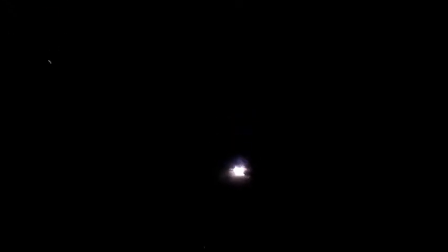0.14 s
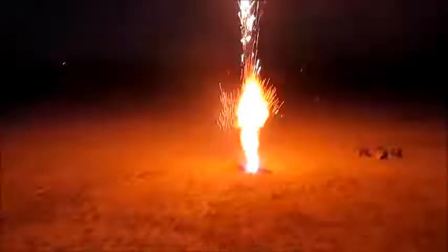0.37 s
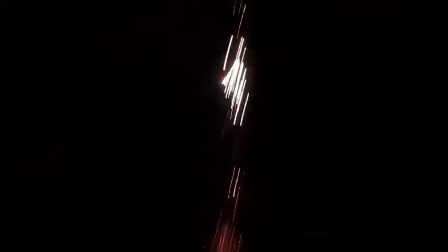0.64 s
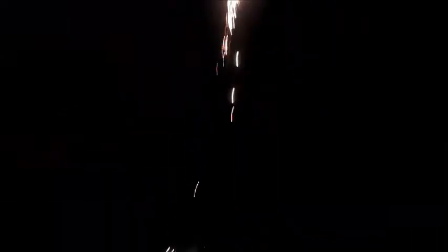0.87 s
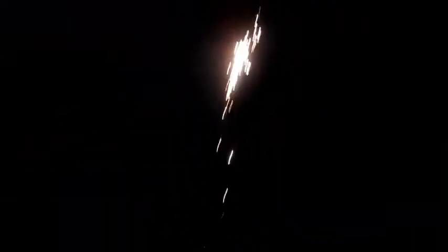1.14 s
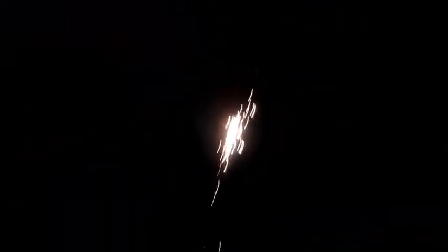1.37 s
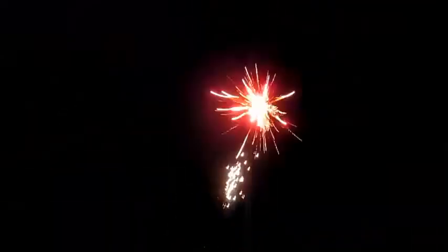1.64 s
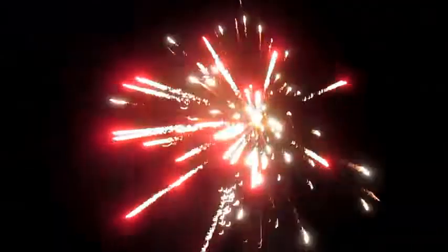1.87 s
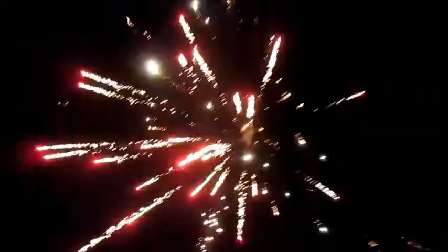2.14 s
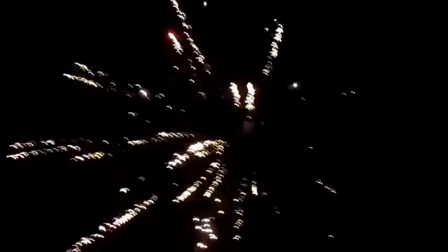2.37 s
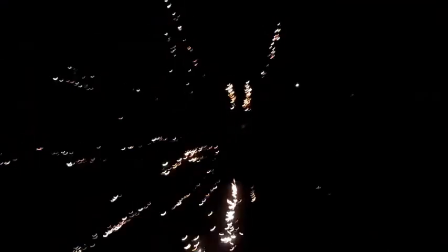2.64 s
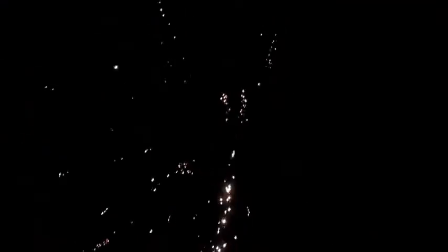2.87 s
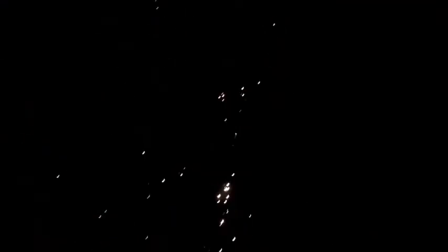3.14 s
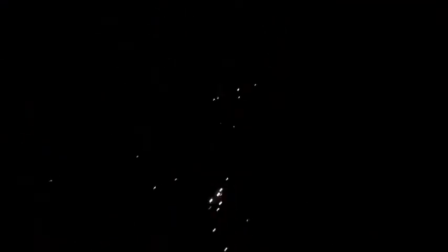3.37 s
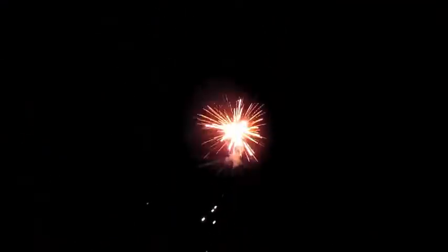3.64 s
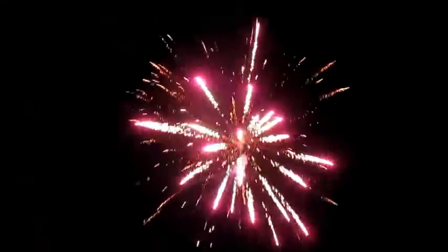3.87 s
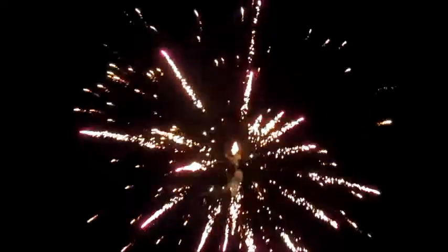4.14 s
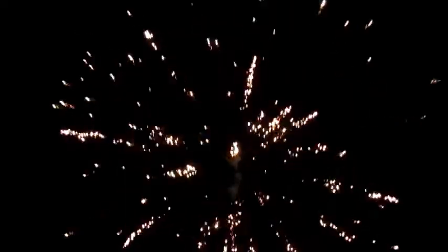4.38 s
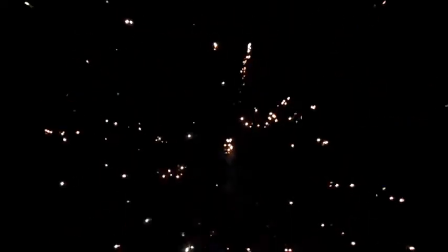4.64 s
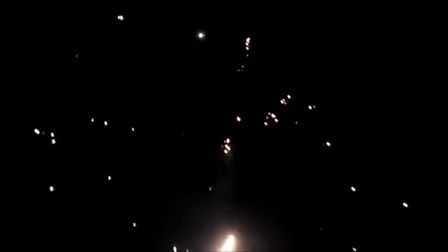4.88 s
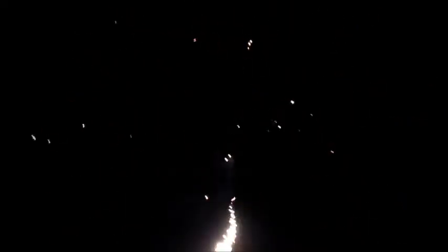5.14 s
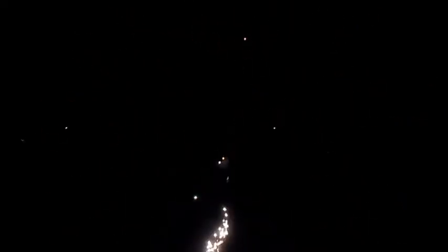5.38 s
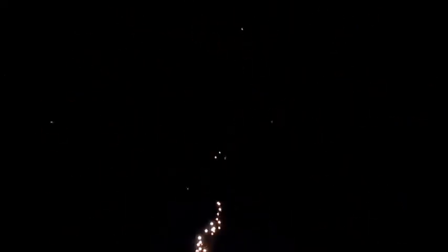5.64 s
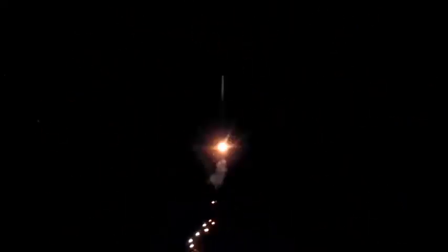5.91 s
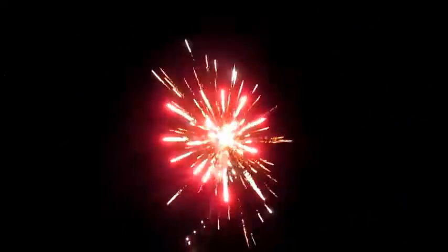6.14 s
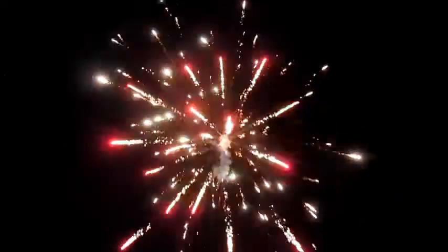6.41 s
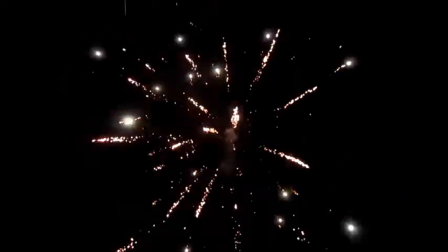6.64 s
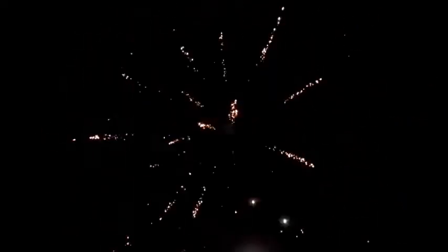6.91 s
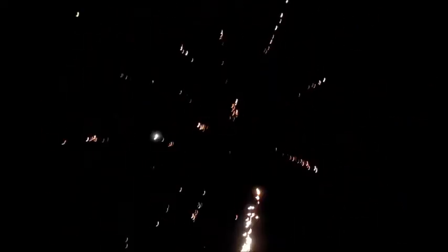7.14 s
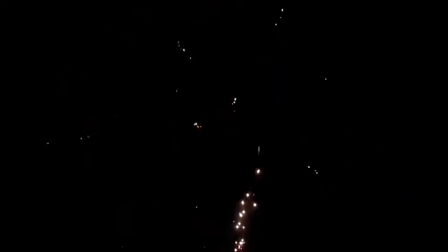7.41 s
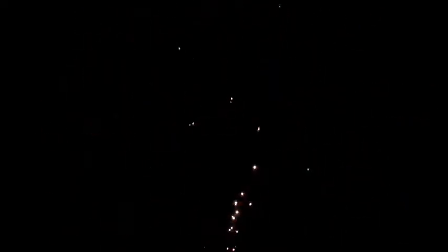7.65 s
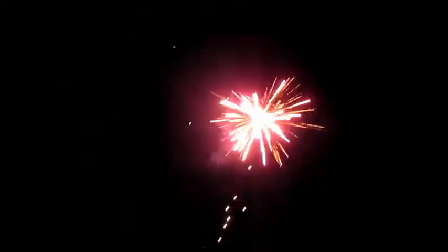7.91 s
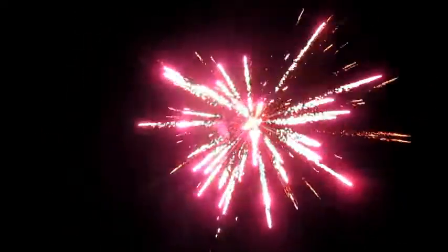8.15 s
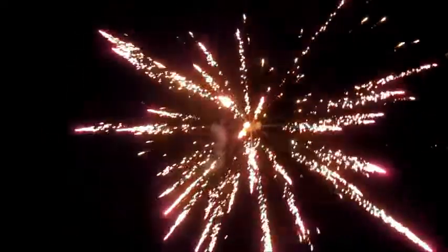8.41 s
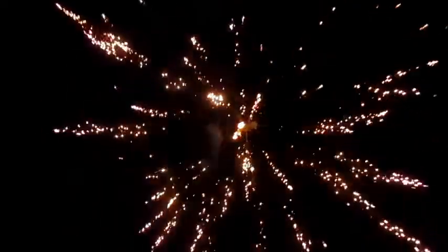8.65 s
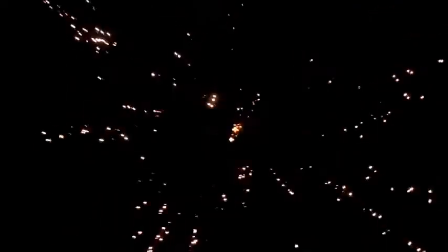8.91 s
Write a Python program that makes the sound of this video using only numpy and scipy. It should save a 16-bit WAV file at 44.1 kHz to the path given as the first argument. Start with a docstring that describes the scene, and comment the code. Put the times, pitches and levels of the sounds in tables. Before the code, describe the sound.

Outdoors at night, a firework cake fires four cracking launches and four sky bangs in steady alternation, distorted up close, their echoes fading into quiet.

```python
"""A firework cake at night. At first wind and the hiss of the fuse (shaped noise) are heard over a town's hum.
Then four times a shell is shot from its tube: a pressure shock and a roar of gas, with returns from a fence
and walls. About 1.4 s after each shot the shell bursts overhead: a sharp shock, a duller copy off the
ground and sky echoes. Every blast overloads the microphone and rolls away as fading noise, while the
background sinks."""
import sys
import numpy as np
from scipy import signal
from scipy.fft import rfft, irfft, next_fast_len
from scipy.io import wavfile
from scipy.ndimage import uniform_filter1d

SR = 44100
rng = np.random.default_rng(int(sys.argv[2]) if len(sys.argv) > 2 else 0)


def digitize_waveform(pressure):
    """Quantize a signal to 16-bit integers and store it at the path in sys.argv[1].

    Rows of a 2-D input are taken as channels; values are limited to [-1, 1].
    """
    field = np.atleast_2d(pressure).T
    bounded = np.clip(field, -1, 1)
    quanta = np.round(bounded * 32767).astype(np.int16)
    wavfile.write(sys.argv[1], SR, quanta)


def to_linear_factor(level_db):
    """Convert decibel levels (scalar or array-like) to linear amplitude factors."""
    exponent = np.asarray(level_db, float) / 20
    return 10 ** exponent


N = 398223

# Shots from the tube. Each row: start in seconds, gas roar in dB before its swell, lead of the roar in ms,
# level of all returns in dB, extra delay of the echoes in ms.
LIFTS = [(0.3157, 2.5, 8.5, 3.5, 7), (2.2531, -12, 2.9, 6, 0.2), (4.4785, -22.5, 5.4, -1.5, 1.5),
         (6.66, -16, 2.6, -3.5, 0.5)]
# Second shock as the shell clears the mouth, one row a lift. Each row: delay in ms, level in dB.
CLEARS = [(2.2, 0.5), (1.4, 1), (1.9, -6), (1.1, 0)]
# Bursts in the sky. Each row: start in seconds, shock in dB, delay of the ground bounce in ms,
# level of all returns in dB, shift of the farthest echoes in ms.
BURSTS = [(1.7027, 5, 10.7, 5, -1), (3.7300, 2, 11.1, 4, -13.5), (6.0650, 1.5, 11.0, 3.5, -7.5),
          (7.9578, 1.5, 10.9, 0.5, 0.6)]
# First bounces off things beside the microphone. Each row: delay in ms, level in dB, hump width in ms.
NEAR_LIFT = [(1.3, -12, 0.4), (2.2, -6, 1.2), (3.2, -11.5, 1.6)]
NEAR_BURST = [(1.4, -9.5, 0.2), (2.5, -3.5, 0.45), (3.0, -8, 5.4)]
# Walls that return every lift. Each row: delay in seconds, level in dB against the returns,
# centre in Hz, width in Hz before a common stretch.
WALLS = [(.117, -27.5, 1200, 1500), (.3085, -21.5, 1740, 7000), (0.3096, -26, 336, 497),
         (.451, -40.5, 1080, 800), (.654, -43.5, 400, 400), (.663, -43.5, 2430, 1800),
         (.688, -50, 2600, 1800), (.712, -42.5, 1210, 913), (.726, -41, 2500, 1770),
         (0.7264, -29.5, 820, 416), (.7345, -42.5, 2460, 1770), (.742, -41, 1900, 2600),
         (0.784, -47.5, 1500, 1500), (.808, -47, 1890, 1190), (1.055, -51.5, 796, 700),
         (1.125, -54.5, 2450, 1500)]
# Fence posts. In order: nominal delay of the first post in seconds, gap in seconds, growth of the gap per post.
FENCE = (.117, .0036, 1.035)
# A barely present bright noise after a shot, on the early slope of a far-off bell curve.
# In order: centre of the bell in seconds, its spread in seconds, level in dB at the centre
# against the returns, centre in Hz, width in Hz.
FAINT_RISE = (3, 0.72, -51, 5000, 3000)
# Walls that return every burst. Each row: delay in seconds, level in dB against the returns, centre in Hz.
SKY_ECHOES = [(.088, -31, 332), (.114, -28.5, 511), (.233, -29.5, 446), (.256, -18.5, 358),
              (.558, -36, 337), (.594, -37.5, 330), (.656, -33.5, 600), (.741, -39.5, 390)]
# A row of five houses. In order: first delay in seconds, gap in seconds, level in dB against the returns,
# change in dB from house to house, centre in Hz.
HOUSES = (0.2, 0.04, -34, -0.1, 373)
# Rolling tails. Each row: frequency in Hz, quick part in dB, its 60 dB fall in seconds,
# slow part in dB, its 60 dB fall in seconds.
LIFT_ROLL = [(60, -39.5, .12, -59, 1.2), (250, -24.5, .1, -46.5, 1.5), (700, -22, .1, -43, 2),
             (1500, -23, 0.15, -36, 0.71), (3000, -32.5, 0.2, -40, 0.39), (5950, -35.5, 0.17, -55.5, 0.79),
             (11000, -48, 0.07, -75.5, 0.55), (16000, -54, .06, -90, .3)]
BURST_ROLL = [(60.8, -46.5, 0.06, -61.5, 1.1), (258.2, -36.5, 0.33, -36.5, 4.44),
              (700, -22, 0.22, -37.5, 2.8), (1500, -33.5, 0.28, -45, 2.6), (2998, -38.5, 0.4, -50, 1.75),
              (6290, -40.5, 0.27, -56, 1.17), (11240, -50, .22, -69.5, .6), (16000, -61, .12, -92, .4)]
# Clicks of the fuse, then soft late knocks, some of them echoes of the first shot.
# Each row: start in seconds, peak in dB, centre in Hz, decay in ms.
CLICKS = [(.007, -38, 2640, 1.3), (.052, -27, 970, 0.93), (.082, -39, 3500, .9), (0.099, -34.5, 2800, 0.58),
          (.154, -36, 2470, 0.51), (0.191, -37, 4000, 0.64), (.208, -21, 1000, 3), (.218, -23, 1201, 3.6),
          (0.258, -34, 2000, 0.84), (.2835, -18.5, 810, 2.1), (1.016, -45.5, 4090, 0.89),
          (1.301, -36.5, 640, 1.2), (1.360, -29.5, 700, 0.65), (1.3789, -29.5, 850, 0.78),
          (1.449, -44, 3180, 0.99), (1.464, -37, 3870, 1.4)]
# Spectra: the wide hiss, the finer treble hiss, the wind and the town.
# Each row: frequency in Hz, relative density in dB per Hz.
WIDE_HISS = [(290, -30.5), (500, -5.5), (906, -5), (1280, -7.5), (1570, -11), (1900, -14), (2160, -21),
             (8830, -35), (16000, -58.5)]
TREBLE_HISS = [(2000, -23), (4500, -2), (9500, -5.5), (13000, -9.5), (16500, -12.5)]
WIND = [(12, -33.5), (20, -7.5), (48, 1), (177, -3), (468, -14.5), (507, -19.5), (900, -25.5), (1170, -52),
        (1980, -120)]
TOWN = [(12, -46.5), (20, -20.5), (54, 3.5), (92, -12.5), (130, -10), (211, -10), (248, -17), (315, -12.5),
        (434, -21), (483, -39), (1050, -32), (2110, -56), (12000, -69), (15600, -99), (22000, -120)]
# Wind gusts and drops. Each row: centre in seconds, change in dB, length in seconds.
GUSTS = [(0.275, 2, .06), (.48, -11.5, .07), (.88, -9, 0.089), (2.3, -0.5, .4), (4.5, 5.5, .5)]
# Wind thumping the microphone. Each row: start in seconds, peak in dB, centre in Hz.
BUFFETS = [(.736, -24.5, 95), (.764, -29, 80), (.776, -29.5, 130)]
# Drones of the town. Each row: centre in Hz, width in Hz, level in dB against the murmur.
HUM = [(59.6, 5.8, -2), (121.4, 12, -10)]
# Common sinking of the background, before each layer's share. Each row: time in seconds, level in dB.
BACKGROUND = [(0, -0.5), (.3, -1), (.4, -13), (1.6, -13.5), (3.0, -17.5), (3.7, -19.5), (5.2, -25),
              (6.0, -23.5), (7.5, -25.5), (9.03, -27.5)]
# Microphone colour. Each row: frequency in Hz, gain in dB.
MICROPHONE = [(20, -12.5), (60, 0), (2200, 1.5), (3200, 0.5), (3950, -5), (4600, -2), (9000, -7.5),
              (16000, -6.5)]

LEAD = 44  # samples ahead of the pressure drop of a shock
LIFT_DB, LIFT_SUCK_MS = 3.5, 1.3
ROAR_HZ, ROAR_HZ_PER_DB, ROAR_PEAK_MS = 540, -22.5, 5.4  # more gas roars deeper
THUMP_DB, THUMP_SHARE = -5.5, 0.57  # the low thump grows with the gas
ROLL_DB, ROLL_SHARE = 3.5, 0.28  # the roll follows the level of the returns
FENCE_DB, LOST_DB = -30, .9  # the first post against the returns, and the loss from post to post
BOUNCE_DB = 1.14
FRONT_MS, STEEPENING = .045, 1.276  # rounding of a 0 dB shock front; a stronger shock is steeper
SWAY_DB, LATE_S = 1.2, 0.27  # echo levels vary by burst; echoes well beyond LATE_S take nearly the full shift
FLARE_DB, FLARE_S = 7.5, .06  # the fuse flares up as it reaches the first tube
TOWN_DB, WIND_DB, WIDE_HISS_DB, TREBLE_HISS_DB = -32.5, -31, -42, -59
# how far each follows BACKGROUND
TOWN_SHARE, WIND_SHARE, WIDE_HISS_SHARE, TREBLE_HISS_SHARE = 0.89, 0.92, 1, 1.15


def read(points, hz, column=1):
    """Joins one column of a spectrum on a log-frequency axis."""
    points = np.transpose(points)
    return np.interp(np.log(hz + 1), np.log(points[0] + 1), points[column])


def evened(x):
    """Scales to rms 1."""
    return x / np.sqrt(np.mean(x ** 2) + 1e-20)


def add(mix, s, sound):
    """Mixes a sound in at a time in seconds."""
    part = mix[round(s * SR):][:len(sound)]
    part += sound[:len(part)]


def band(x, hz, width_hz):
    """A resonant band, applied twice for steep sides; the result peaks at 1."""
    b, a = signal.iirpeak(hz, hz / width_hz, SR)
    once = signal.lfilter(b, a, np.pad(x, (0, 400)))
    twice = signal.lfilter(b, a, once)
    return twice / abs(twice).max()


def band_noise(size, hz, width_hz):
    """A stretch of noise in a resonant band, at rms 1."""
    return evened(band(rng.standard_normal(size), hz, width_hz)[:size])


def shock(push_ms, suck_ms, round_ms):
    """A short push, a sudden drop to suction, and a curved climb back, all rounded by a one-pole lowpass."""
    ms = (np.arange(300) - LEAD) * 1000 / SR
    push = 0.58 * ((ms > -push_ms) & (ms < 0))
    suction = (ms >= 0) * np.maximum(1 - abs(ms / suck_ms) ** 2.2, 0)
    keep = np.exp(-1000 / SR / round_ms)
    return signal.lfilter([1 - keep], [1, -keep], push - suction)


def humps(rows):
    """Rounded upright bounces just behind the shock."""
    ms = (np.arange(600) - LEAD) * 1000 / SR
    return sum(to_linear_factor(db) * np.exp(-(2 * (ms - at) / width) ** 2) for at, db, width in rows)


def rough(wave, smear_ms, smear_db):
    """An uneven wall: the bounce drags a short scatter behind it."""
    ms = np.arange(900) * 1000 / SR
    scatter = to_linear_factor(smear_db) * rng.standard_normal(900) * np.exp(-ms / smear_ms)
    return np.convolve(wave, scatter + (ms == 0))


def noise(gain, size, patchy_db, flicker_db):
    """Random short-time spectra under gain(Hz, s), with local patches and a flicker shared by all bands."""
    hz, count = np.fft.rfftfreq(512, 1 / SR), size // 128 + 5
    real, imaginary, patches = rng.standard_normal((count, len(hz), 3)).T
    patches = uniform_filter1d(patches, size=5, axis=0)
    patches = evened(uniform_filter1d(patches, size=4, axis=1))
    flicker = evened(uniform_filter1d(rng.standard_normal(count), size=3))
    field = gain(hz[:, None], np.arange(count) * 128 / SR)
    field = field * to_linear_factor(patchy_db * patches + flicker_db * flicker)
    return signal.istft((real + 1j * imaginary) * field, nperseg=512, noverlap=384)[1][:size]


def roll(rows, db):
    """Countless small reflections: each frequency has a quick fall and a slower murmur behind it."""
    def gain(hz, t):
        quick = to_linear_factor(read(rows, hz, column=1) - 60 * t / read(rows, hz, column=2))
        slow = to_linear_factor(read(rows, hz, column=3) - 60 * t / read(rows, hz, column=4))
        return np.hypot(quick, slow) / np.sqrt(len(hz)) * 4
    x = noise(gain, 2 * SR, patchy_db=1.6, flicker_db=1.9)
    fade_in = np.minimum(np.arange(len(x)) / (0.0017 * SR), 1)
    return to_linear_factor(db) * x * fade_in


def scattered_bounces(wave, hz, per_s, db, t60):
    """Single bounces off houses and trees inside the roll, at random times and fading 60 dB in t60 s."""
    t = np.arange(round(1.5 * SR)) / SR
    hits = rng.random(len(t)) < per_s / SR
    train = hits * rng.standard_normal(len(t)) * to_linear_factor(db - 60 * t / t60)
    return signal.oaconvolve(train, band(wave, hz, 3.1 * hz))


def gas_roar(roar_db):
    """Gas rushing from the tube: a deep noise band and a tearing hiss under one swell."""
    ms = np.arange(1600) * 1000 / SR
    roar_hz = ROAR_HZ + ROAR_HZ_PER_DB * roar_db
    gas = band_noise(1600, roar_hz, 1.7 * roar_hz)
    gas += to_linear_factor(-7) * band_noise(1600, 3100, 6000)  # tearing hiss
    x = ms / ROAR_PEAK_MS
    swell = x ** 1.61 * (np.exp(1 - x ** 2.1) + 0.65 * np.exp(-ms / 5.9))
    return to_linear_factor(roar_db) * gas * swell


def wall_echoes(out, start, back_db):
    """Small walls return only the sharp edge of a lift; later returns smear longer."""
    slap = shock(0.22, .6, 0.075)
    for after, wall_db, hz, width in WALLS:
        echo = band(rough(slap, 8.8 * after, -25), hz, 1.13 * width)
        add(out, start + after, to_linear_factor(wall_db + back_db) * echo)


def faint_rise(back_db):
    """A barely present bright noise, rising slowly for half a second after a shot."""
    centre_s, spread_s, rise_db, hz, width = FAINT_RISE
    bright = band_noise(SR // 2, hz, width)
    rise = np.exp(-((np.arange(SR // 2) / SR - centre_s) / spread_s) ** 2)
    return to_linear_factor(rise_db + back_db) * bright * rise


def fence_delays():
    """Delays of sixteen unevenly spaced posts, whose gaps tend to widen."""
    first, gap, growth = FENCE
    gaps = gap * growth ** np.arange(16) * rng.uniform(.8, 1.25, 16)
    return first + np.cumsum(gaps) - gap


def fence_echoes(out, start, wave, delays, back_db):
    """Each post returns a bright copy of the lift, weaker from post to post."""
    for k, at in enumerate(delays):
        add(out, start + at, to_linear_factor(FENCE_DB + back_db - LOST_DB * k) * band(wave, 5700, 10500))


def lifts():
    """Each shot is a tube shock, a second shock at the mouth, a gas roar, and its returns and roll."""
    out, delays = np.zeros(N), fence_delays()
    wave = shock(.42, LIFT_SUCK_MS, 0.094)
    for lift, (clear_ms, clear_db) in zip(LIFTS, CLEARS):
        s, roar_db, ahead_ms, back_db, late_ms = lift
        start, late = s - LEAD / SR, late_ms / 1000
        thump_db = THUMP_DB + THUMP_SHARE * roar_db
        roll_db = ROLL_DB + ROLL_SHARE * back_db
        add(out, start, to_linear_factor(LIFT_DB) * wave)
        add(out, start + clear_ms / 1000, to_linear_factor(clear_db) * shock(.4, .7, 0.023))
        add(out, start, humps(NEAR_LIFT + [(3.4, thump_db, 5.5)]))
        add(out, s - ahead_ms / 1000, gas_roar(roar_db))
        add(out, s + .002, roll(LIFT_ROLL, roll_db))
        add(out, s + .008, scattered_bounces(wave, 1300, 140, roll_db - 35, .6))
        wall_echoes(out, start + late, back_db)
        add(out, s + late, faint_rise(back_db))
        fence_echoes(out, start + late, wave, delays, back_db)
    return out


def body_scatter(db):
    """A brief noise scattered off hand, body and clothes."""
    ms = np.arange(500) * 1000 / SR
    return to_linear_factor(.6 * db - 5) * band(rng.standard_normal(500), 2200, 5000)[:500] * np.exp(-ms / 1.5)


def sky_echoes(out, s, wave, dull, back_db, late_ms):
    """Walls and houses return a dull thud and, on top, a snap that the air weakens with distance."""
    first, gap, house_db, step_db, house_hz = HOUSES
    houses = [(first + gap * k, house_db + step_db * k, house_hz) for k in range(5)]
    for way, echo_db, hz in SKY_ECHOES + houses:
        at = s + way + late_ms / 1000 * np.tanh(way / LATE_S)  # each burst is elsewhere in the sky
        echo_db = echo_db + back_db + SWAY_DB * rng.uniform(-0.993, 1)
        thud = band(rough(dull, 2.6, -17.5), hz, 2.13 * hz)
        add(out, at + 0.0015, to_linear_factor(echo_db) * thud)
        snap = band(rough(wave, 12 * way, -13.5), 1700, 3640)
        add(out, at, to_linear_factor(echo_db - 1.5 - 15 * way) * snap)


def bursts():
    """Each burst is a shock from the sky, its duller copy off the ground, echoes and the roll."""
    out = np.zeros(N)
    wave, dull = shock(0.45, 1.4, 0.015), shock(0.75, 1.55, 0.051)
    for s, db, bounce_ms, back_db, late_ms in BURSTS:
        start, bounce_s = s - LEAD / SR, bounce_ms / 1000
        add(out, start, to_linear_factor(db) * shock(0.45, 1.3, FRONT_MS * to_linear_factor(-STEEPENING * db)))
        add(out, start, to_linear_factor(.4 * db - 1.5) * humps(NEAR_BURST))
        add(out, s + 0.0009, body_scatter(db))
        add(out, start + bounce_s, to_linear_factor(BOUNCE_DB) * dull)
        add(out, start + bounce_s, to_linear_factor(BOUNCE_DB - 12) * humps(NEAR_BURST))
        add(out, s + bounce_s, roll(BURST_ROLL, back_db))
        add(out, s + 0.032, scattered_bounces(dull, 480, 110, back_db - 31, 1.8))
        add(out, s + 0.03, scattered_bounces(wave, 1900, 160, back_db - 39, 1.0))
        sky_echoes(out, s, wave, dull, back_db, late_ms)
    return out


def clicks():
    """Clicks of the fuse, then soft late knocks, some of them echoes of the first shot: puffs of band noise."""
    out, ms = np.zeros(N), np.arange(700) * 1000 / SR
    for s, db, hz, length_ms in CLICKS:
        puff = rng.standard_normal(700) * ms * np.exp(-ms / length_ms)
        add(out, s, to_linear_factor(db) * band(puff, hz, .65 * hz))
    return out


def steady(spectrum, level_db, lumps_db, lump_ms):
    """Coloured noise on a level, lumpy from moment to moment."""
    size = next_fast_len(N)
    colour = to_linear_factor(read(spectrum, np.fft.rfftfreq(size, 1 / SR)))
    x = evened(irfft(rfft(rng.standard_normal(size)) * colour, size)[:N])
    span = round(lump_ms * SR / 1000)
    lumps = uniform_filter1d(rng.standard_normal(N), span)
    lumps = evened(uniform_filter1d(lumps, span))
    return x * to_linear_factor(level_db + lumps_db * lumps)


def hiss(t, sunk_db):
    """Wide hiss and finer treble hiss throughout, strongest while the fuse burns until the first shot."""
    flare_db = FLARE_DB * np.exp(-abs(t - LIFTS[0][0]) / FLARE_S)
    wide_db = WIDE_HISS_DB + WIDE_HISS_SHARE * sunk_db + flare_db
    treble_db = TREBLE_HISS_DB + TREBLE_HISS_SHARE * sunk_db + .7 * flare_db
    wide = steady(WIDE_HISS, wide_db, lumps_db=2.0, lump_ms=10)
    return wide + steady(TREBLE_HISS, treble_db, lumps_db=1.5, lump_ms=3)


def wind(t, sunk_db):
    """Moving air is low, lumpy noise that gusts and drops."""
    gust_db = sum(db * np.exp(-((t - s) / length) ** 2) for s, db, length in GUSTS)
    return steady(WIND, WIND_DB + WIND_SHARE * sunk_db + gust_db, lumps_db=3.5, lump_ms=18)


def buffets():
    """Wind thumps the microphone with single low pushes of air."""
    out = np.zeros(N)
    for s, db, hz in BUFFETS:
        push = np.pad(np.hanning(90), (0, 900))
        add(out, s, to_linear_factor(db) * band(push, hz, 1.55 * hz))
    return out


def town(sunk_db):
    """A wide noise murmur, with two wavering drones drawn from it by narrow bands."""
    x = steady(TOWN, TOWN_DB + TOWN_SHARE * sunk_db, lumps_db=1.17, lump_ms=60)
    rms = np.sqrt(np.mean(x ** 2))
    drones = sum(to_linear_factor(db) * rms * evened(band(x, hz, width)[:N]) for hz, width, db in HUM)
    return x + drones


def scene():
    """All sources at one microphone."""
    t = np.arange(N) / SR
    sunk_db = np.interp(t, *np.transpose(BACKGROUND))
    blasts = lifts() + bursts()
    background = hiss(t, sunk_db) + wind(t, sunk_db) + buffets() + town(sunk_db)
    return (blasts + clicks() + background)[None]


def roll_off(x):
    """The treble ends steeply here."""
    return signal.sosfilt(signal.butter(12, 16430, fs=SR, output="sos"), x)


def record(dry):
    """Microphone colour, gain control that ducks after each blast, hard overload and a treble limit."""
    response = to_linear_factor(read(MICROPHONE, np.linspace(0, SR / 2, 400)))
    colour = signal.firwin2(1023, np.linspace(0, 1, 400), response)
    coloured = signal.oaconvolve(dry, colour[None], "same")
    heard = signal.lfilter(*signal.butter(1, 30, "high", fs=SR), coloured)
    level_db = 20 * np.log10(abs(heard) + 1e-9)
    fall = np.arange(N) * 30.7 / SR  # the held peak sinks by so many dB a second
    held_db = np.maximum.accumulate(np.minimum(level_db, 0) + fall, axis=1) - fall
    over_db = np.clip(held_db + 27.5, 0, None)
    keep = np.exp(-1 / (.014 * SR))  # the gain takes some ms to move
    duck_db = 0.22 * signal.lfilter([1 - keep], [1, -keep], over_db)
    overloaded = np.clip(heard / to_linear_factor(duck_db), -1, 1)
    limited = signal.lfilter(*signal.butter(2, 14000, fs=SR), overloaded)
    return roll_off(limited)


dry = scene()
out = record(dry)
digitize_waveform(out)
```